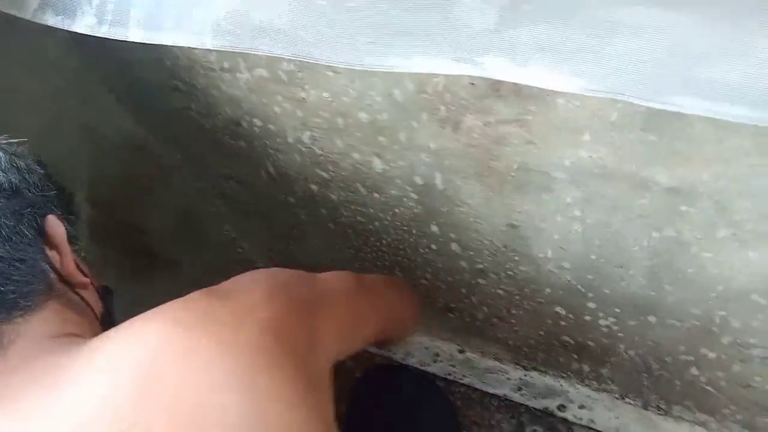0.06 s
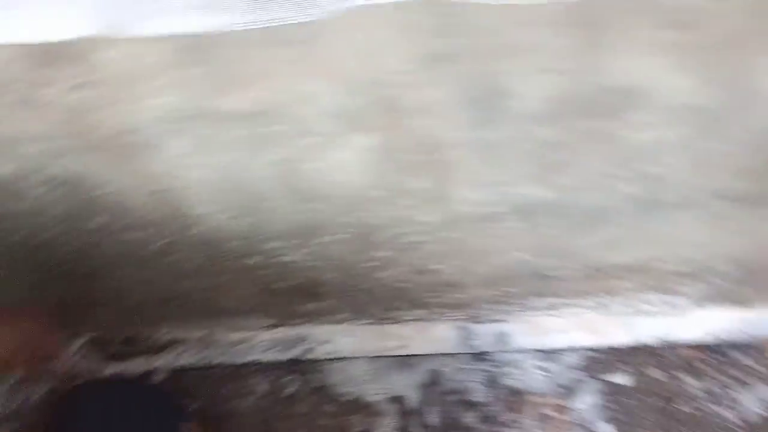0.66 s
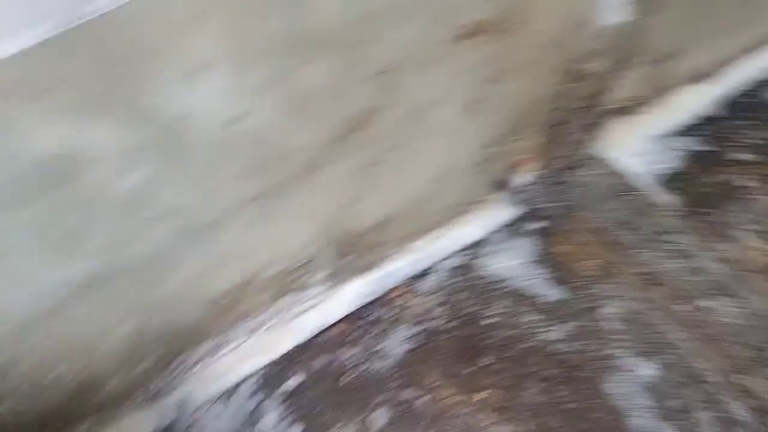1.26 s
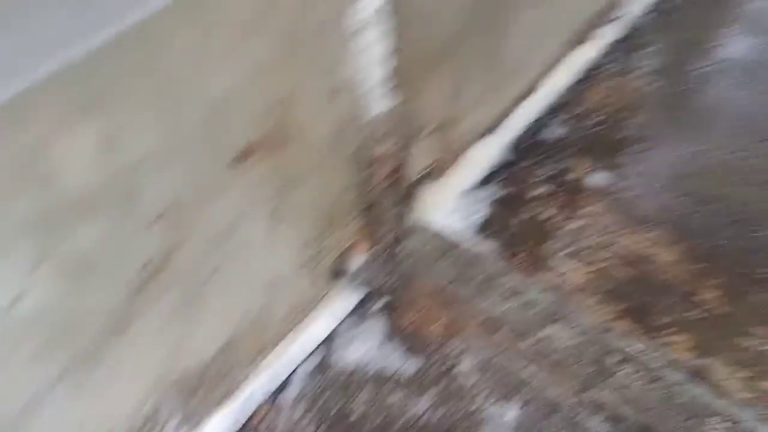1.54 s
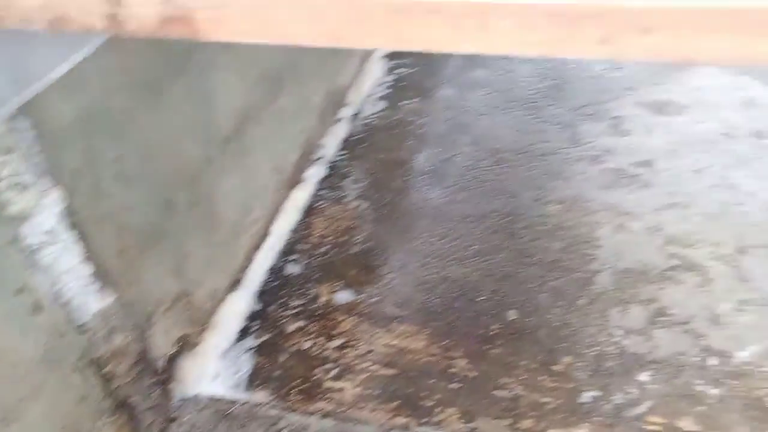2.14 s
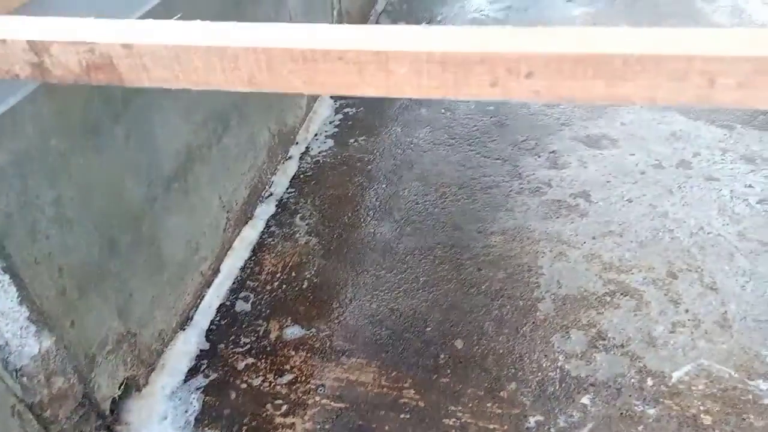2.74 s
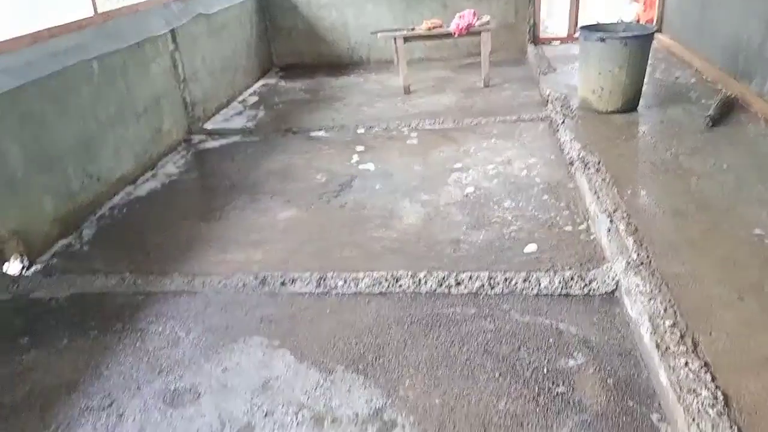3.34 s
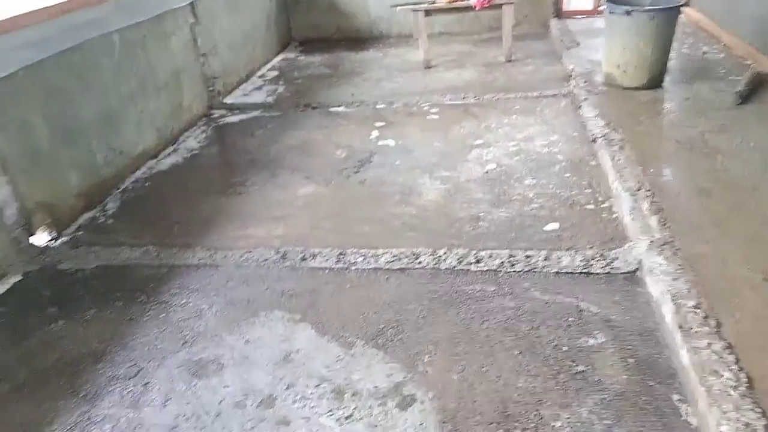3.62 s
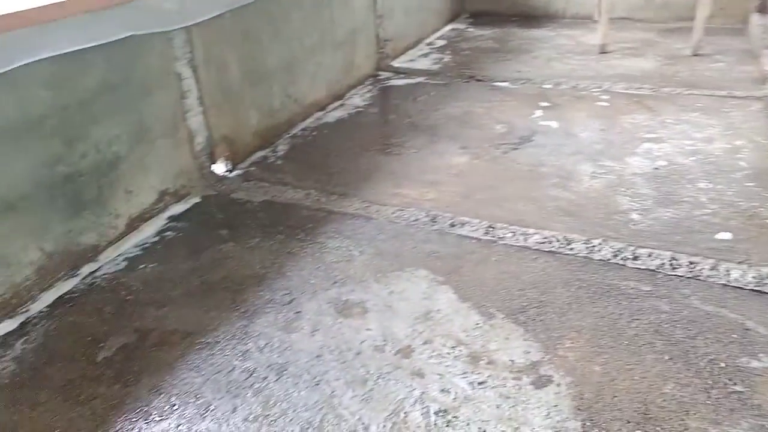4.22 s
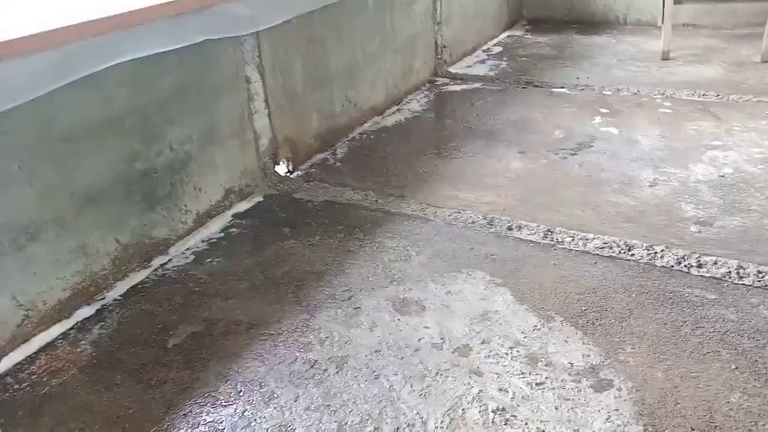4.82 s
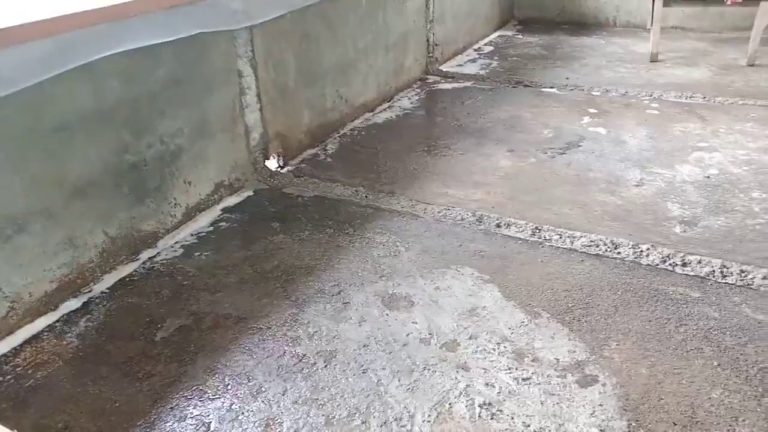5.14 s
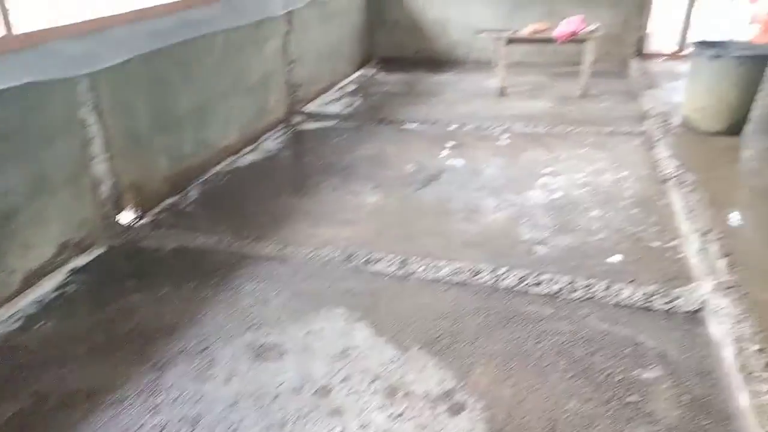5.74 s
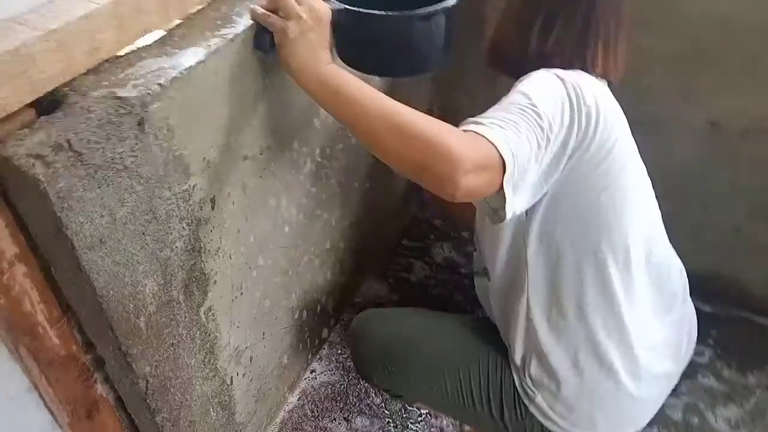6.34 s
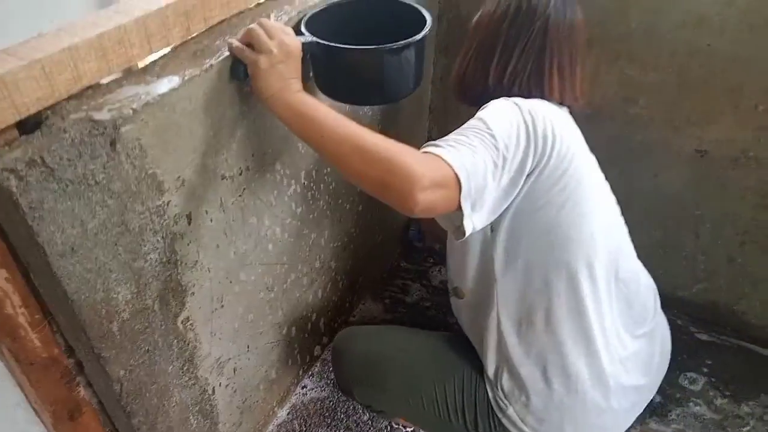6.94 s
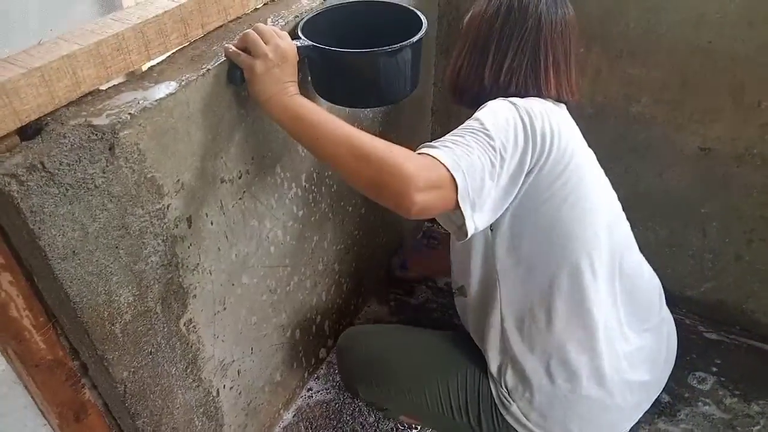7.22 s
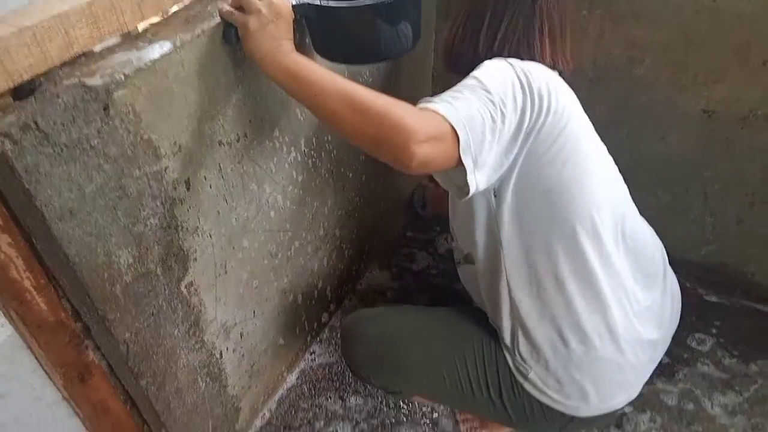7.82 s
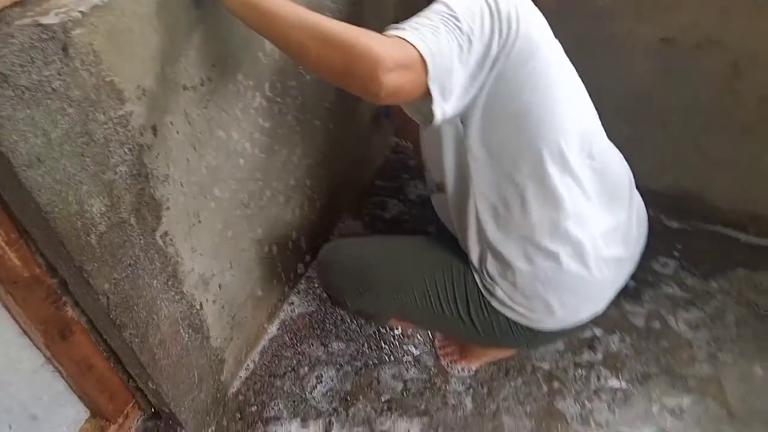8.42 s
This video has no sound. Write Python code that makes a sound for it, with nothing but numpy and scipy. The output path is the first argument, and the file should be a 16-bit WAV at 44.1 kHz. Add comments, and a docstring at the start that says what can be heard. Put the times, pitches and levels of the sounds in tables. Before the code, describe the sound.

Stiff bristles rasp and fizz back and forth over soapy concrete, hard then lightly, the brush knocking now and then.

```python
"""Hand brushes scrub three wet, soapy concrete walls of a farm building, four or five strokes a second. On the
first wall, bristles rasp over grit, suds fizz and the brush block rubs, hard and then lightly, over a far
motor, murmuring air and a hollow drone. Bristles snap free; fingers tap and bump a hand-held case. After a
brief silence near 3 s the motor is gone and the second wall is scrubbed, the block knocking now and then. At
6.28 s the scene changes: another hand scrubs the third wall in uneven, gritty strokes."""
import sys
import numpy as np
from scipy import signal
from scipy.fft import rfft, irfft, next_fast_len
from scipy.io import wavfile
from scipy.ndimage import uniform_filter1d

SR = 44100
rng = np.random.default_rng(int(sys.argv[2]) if len(sys.argv) > 2 else 0)


def pcm_store(signal):
    """Save signal as 16-bit PCM."""
    levels = np.round(np.clip(np.atleast_2d(signal), -1, 1) * 32767)
    wavfile.write(sys.argv[1], SR, levels.astype(np.int16).T)


N = 373522
TIME = np.arange(N) / SR


def from_db(db):
    """Amplitude grows tenfold for every 20 dB."""
    return 10 ** (np.asarray(db) / 20)


def unit_power(x):
    """Division by the RMS amplitude gives unit power."""
    return x / np.sqrt(np.mean(x ** 2) + 1e-20)


def in_time(rows):
    """Linear interpolation joins (time, value) points into a curve."""
    return np.interp(TIME, *np.transpose(rows))


def drift(per_s):
    """Interpolated random values form a slow fluctuation of unit power."""
    knots = rng.standard_normal(4096)
    return unit_power(np.interp(TIME * per_s, np.arange(len(knots)), knots))


def lowpass(x, order, cutoff_hz):
    """A low-pass filter falls 6 dB per octave per order above its cutoff."""
    return signal.sosfilt(signal.butter(order, cutoff_hz, fs=SR, output="sos"), x)


def coloured(x, spectrum):
    """Spectral shaping, falling 20 dB per octave beyond the given points; unit power."""
    size = next_fast_len(N)
    hz = np.maximum(np.arange(size // 2 + 1) * SR / size, 1)
    points_hz, db = np.transpose(spectrum)
    octaves_outside = np.abs(np.log2(hz / np.clip(hz, points_hz[0], points_hz[-1])))
    gain = from_db(np.interp(np.log(hz), np.log(points_hz), db) - 20 * octaves_outside)
    return unit_power(irfft(rfft(x, size) * gain, size)[:N])


def resonance(x, hz, width_hz):
    """A damped two-pole resonator passes one band, with unit gain at its peak."""
    radius = np.exp(-np.pi * width_hz / SR)
    feedback = [1, -2 * radius * np.cos(2 * np.pi * hz / SR), radius ** 2]
    return signal.lfilter(np.array([1, 0, -1]) * (1 - radius ** 2) / 2, feedback, x + 1e-18)


def grains(per_s, spread_db):
    """Shot noise: independent clicks of uneven size, at unit power."""
    sizes = from_db(spread_db * np.minimum(rng.exponential(1, N), 5)) * rng.choice([-1, 1], N)
    return unit_power(sizes * (rng.random(N) < per_s / SR))


def decay(t, t60):
    """Exponential damping loses 60 dB in t60 seconds."""
    return np.exp(-np.log(1000) * t / t60)


def burst(t60):
    """A brief contact makes exponentially decaying noise."""
    t = TIME[:SR // 4]
    return rng.standard_normal(len(t)) * decay(t, max(t60, .002))


def add(track, start_s, sound, peak_db):
    """Superposition: a sound, scaled to the given peak, adds to a track."""
    at = max(round(start_s * SR), 0)
    track[at:at + len(sound)] += (sound * from_db(peak_db) / np.abs(sound).max())[:N - at]


def hand(turn_db, press_db, press_per_s):
    """Friction noise follows a power law of hand speed; gives rasp, fizz and rub levels in dB."""
    # strokes, with relative levels at full speed: start_s, rise_s, fall_s, rasp_db, fizz_db, rub_db
    strokes = [(-0.025, 0.08, 0.17, -22.5, -37, -41), (0.195, 0.15, 0.096, -20.5, -37, -39),
               (0.41, 0.17, 0.18, -20.5, -38, -35), (0.728, 0.21, 0.18, -19, -37, -34),
               (0.95, 0.054, 0.15, -27.5, -44.5, -35), (1.099, 0.11, 0.14, -35.5, -44, -58),
               (1.26, 0.16, 0.16, -36.5, -49, -64), (1.514, 0.14, 0.17, -37.5, -47, -61),
               (1.76, 0.18, 0.18, -35, -44, -58), (2.05, 0.074, 0.15, -37, -47, -50),
               (2.14, 0.1, 0.11, -32.5, -44, -47), (2.305, 0.13, 0.15, -33.5, -42, -59.5),
               (2.478, 0.15, 0.11, -25.5, -27, -54.5), (2.689, 0.206, 0.138, -27.5, -32.5, -51),
               (3.065, 0.071, 0.09, -42, -64.5, -71), (3.173, 0.17, 0.11, -30.5, -48.5, -57),
               (3.4, 0.13, 0.15, -30, -51, -57), (3.6, 0.142, 0.25, -33, -62, -73),
               (3.85, 0.085, 0.16, -26.5, -53.5, -63), (4.059, 0.085, 0.27, -25.5, -49, -67),
               (4.324, 0.12, 0.19, -20.5, -46, -58), (4.565, 0.12, 0.16, -21, -54, -62),
               (4.816, 0.14, 0.087, -24.5, -58.5, -36.5), (5.025, 0.13, 0.12, -22.5, -61, -43.5),
               (5.271, 0.088, 0.054, -30.5, -60.5, -47), (5.63, 0.098, 0.096, -50.5, -97, -38),
               (5.899, 0.11, 0.16, -42.5, -68.5, -47), (6.156, 0.038, 0.097, -40, -76, -42),
               (6.254, 0.057, 0.2, -36.5, -58.5, -42.5), (6.475, 0.11, 0.1, -36.5, -65.5, -46),
               (6.668, 0.23, 0.13, -38, -63.5, -42.5), (6.98, 0.12, 0.06, -52.5, -84, -57),
               (7.154, 0.16, 0.19, -29.5, -67.5, -37.5), (7.457, 0.078, 0.26, -33, -67, -47),
               (7.7, 0.077, 0.15, -42.5, -76, -47), (7.916, 0.02, 0.066, -36.5, -66.5, -46),
               (7.975, 0.042, 0.13, -33.5, -63, -42.5), (8.15, 0.1, 0.086, -35.5, -67, -50),
               (8.31, 0.1, 0.26, -41.5, -72.5, -52)]
    exponents = (1.48, 1.54, 2.37)   # rasp, fizz, rub
    power = np.zeros((3, N))
    for start, rise, fall, *full_db in strokes:
        end = start + rise + fall
        during = slice(*np.searchsorted(TIME, [start, end]))
        speed = np.sin(np.interp(TIME[during], [start, start + rise, end], [0, np.pi / 2, np.pi]))
        for layer, db, exponent in zip(power, full_db, exponents):
            layer[during] += (from_db(db) * np.abs(speed) ** exponent) ** 2
    # the bristles keep brushing as they flip over at the turn
    turning = from_db(turn_db) ** 2 * np.abs(uniform_filter1d(power, size=SR // 5))
    uneven_pressure_db = press_db * drift(press_per_s)
    return 10 * np.log10(power + turning + 1e-12) + uneven_pressure_db


def lightness(levels, usual_db):
    """Lubrication: a light, wet stroke has a fizz-to-rasp ratio above the wall's usual one (dB)."""
    rasp_level, fizz_level, _ = levels
    return uniform_filter1d(np.clip(fizz_level - rasp_level - usual_db, -15, 15), size=SR // 50)


def bristles(colour, lightness_db, flicks_per_s, spread_db, tilt, pivot_hz, tuft_db):
    """Stick-slip friction: tufts flick over grit, rasping low when bent hard, higher when skimming."""
    flicks = coloured(grains(flicks_per_s, spread_db), colour)
    low = signal.sosfiltfilt(signal.butter(3, pivot_hz, fs=SR, output="sos"), flicks)
    high = flicks - low
    lift = from_db(tilt * lightness_db)
    power = np.mean(low ** 2) + np.mean(high ** 2) * lift ** 2
    low = low * from_db(tuft_db * drift(90))
    high = high * from_db(tuft_db * drift(130))
    return (low + lift * high) / np.sqrt(power)


def tuft_ring(pitch, rasp_level, lightness_db, hard_db, ring_db, width_hz, waver):
    """Bent bristles resonate in a narrow band, weaker in soft strokes and damped by slippery suds."""
    soft_loss_db = 0.4 * np.maximum(hard_db - rasp_level, 0)
    slip_loss_db = 1.6 * np.maximum(lightness_db, 0)
    sway = lowpass(rng.standard_normal((2, N)), 2, width_hz / 2)
    phase = 2 * np.pi * np.cumsum(in_time(pitch) * (1 + waver * drift(40))) / SR
    band = unit_power(sway[0] * np.cos(phase) + sway[1] * np.sin(phase))
    return from_db(ring_db - soft_loss_db - slip_loss_db) * band


def scrub(levels, rasp, fizz_colour, rub_colour, rasp_db, fizz_db, rub_db, judder_db):
    """The hand's judder on the rough wall amplitude-modulates rasp, bursting suds and rubbing block."""
    rasp_level, fizz_level, rub_level = levels
    fizz = coloured(grains(per_s=16000, spread_db=2.5), fizz_colour)
    rub = coloured(grains(per_s=2500, spread_db=3.5), rub_colour)
    sound = (from_db(rasp_level + rasp_db) * rasp
             + from_db(fizz_level + fizz_db) * fizz
             + from_db(rub_level + rub_db) * rub)
    return sound * from_db(judder_db * drift(55))


def near_echoes(x, echo_db, travel_s):
    """Comb filtering: reflections from floor, arm and body shift in delay as the brush travels."""
    lags_s = np.geomspace(.002, .013, num=4)
    echoes = sum((-1) ** k * np.interp(TIME - lag - travel_s * drift(5), TIME, x, left=0)
                 for k, lag in enumerate(lags_s))
    return (x + from_db(echo_db) * echoes) / np.sqrt(1 + len(lags_s) * from_db(2 * echo_db))


def building(x, wet_db, t60, wall_hz):
    """Reverberation: bare concrete returns a dense, dull tail after 5 ms."""
    t = TIME[:SR]
    tail = lowpass(rng.standard_normal(SR) * decay(t, t60) * (t > .005), 2, wall_hz)
    return x + from_db(wet_db) * signal.fftconvolve(x, tail / np.linalg.norm(tail))[:N]


def first_wall(levels):
    """Friction excites the bristles in hard strokes close by, then in lighter, soapier ones."""
    # spectra of bristles, suds and rubbing block: frequency_hz, density_db
    rasp_colour = [(700, -31.5), (1150, -5), (1400, -5.5), (1680, -2.5), (2150, 0), (2450, 0), (3000, -1),
                   (3900, -7), (4900, -17), (6500, -18.5), (9000, -40)]
    fizz_colour = [(2000, -30), (3300, 5), (5000, -1), (6300, -3), (8000, -1), (9700, -9.5), (11300, -8),
                   (12500, -9.5), (13800, -4.5), (15600, -11)]
    rub_colour = [(120, -28.5), (230, -8.5), (340, 0.5), (440, -3), (600, -1), (720, 4.5), (950, 0.5),
                  (1250, -20), (1900, -20)]
    # bristle resonance as the grip changes: time_s, pitch_hz
    ring_pitch = [(0.1, 1600), (0.6, 1646), (0.85, 2007), (1.02, 1709)]
    light_db = lightness(levels, usual_db=-13.5)
    rasp = bristles(rasp_colour, light_db, flicks_per_s=12000, spread_db=2.0,
                    tilt=0.82, pivot_hz=2260, tuft_db=1.0)
    ring = tuft_ring(ring_pitch, levels[0], light_db,
                     hard_db=-21.5, ring_db=-2.5, width_hz=260, waver=0.045)
    sound = scrub(levels, from_db(-1.7) * rasp + ring, fizz_colour, rub_colour,
                  rasp_db=-1.75, fizz_db=1.05, rub_db=1.8, judder_db=0.26)
    sound = near_echoes(sound, echo_db=-18.5, travel_s=0.00014)
    return building(sound, wet_db=-16.5, t60=.45, wall_hz=5070)


def motor(level_db, fundamental_hz, waver, flutter_db):
    """Only low harmonics of a far motor carry, wavering a little in pitch and level."""
    # motor envelope: time_s, relative_db
    envelope = [(0.0, -48.5), (0.4, -49.5), (0.55, -39.5), (0.94, -47.5), (1.1, -45), (1.47, -42.5),
                (1.84, -56), (2.9, -54.5)]
    # motor harmonics: multiple, relative_db
    harmonics = [(2, 7.5), (3, -18), (4, -14)]
    phase = 2 * np.pi * np.cumsum(fundamental_hz * (1 + waver * drift(5))) / SR
    hum = sum(from_db(db + flutter_db * drift(7.8)) * np.sin(k * phase) for k, db in harmonics)
    return from_db(in_time(envelope) + level_db) * hum


def air(level_db):
    """Broadband noise of outdoor air fills the building with a low murmur."""
    # spectrum of the air: frequency_hz, density_db
    colour = [(20, -46), (32, -19.5), (48, -10.5), (80, 2), (140, -3), (210, -3.5), (350, -10), (600, -13),
              (1200, -16.5), (3000, -14.5), (7000, -54), (11300, -49), (15000, -63.5)]
    # its envelope: time_s, relative_db
    envelope = [(0.0, -47), (2.85, -50), (3.1, -60), (3.28, -46), (4.5, -49.5), (5.0, -45), (6.2, -44.5),
                (6.6, -51), (8.46, -53.5)]
    return from_db(in_time(envelope) + level_db) * coloured(rng.standard_normal(N), colour)


def drone(level_db):
    """Narrow resonances filter far-off noise into faint, hollow, wavering tones."""
    # drone resonances: centre_hz, width_hz, relative_db
    bands = [(130.6, 7.9, 4), (161.7, 10, -7.5), (262, 11, -4.5), (301.8, 9.3, -1.5), (343, 29, 3),
             (382, 26, 0.5), (453, 57, -1), (541, 31, -11), (597, 45, -5), (815, 27, -10)]
    # drone envelope: time_s, relative_db
    envelope = [(0, -63.5), (2.1, -42), (2.9, -46), (3.2, -65.5), (4.5, -58), (5.2, -40.5), (6.4, -58),
                (8.4, -55.5)]
    far = rng.standard_normal(N)
    tones = sum(from_db(db) * unit_power(resonance(resonance(far, hz, width), hz, width))
                for hz, width, db in bands)
    return from_db(in_time(envelope) + level_db) * unit_power(tones)


def snaps(level_db, width_hz, plink_db):
    """A stiff bristle springs free with a tick, and a small bubble rings as a damped oscillator."""
    # bristle releases: start_s, relative_peak_db, pitch_hz, t60_s
    releases = [(2.0812, -21, 2190, 0.04), (2.379, -18, 3220, 0.039), (2.423, -19, 3230, 0.019),
                (2.4528, -16, 2620, 0.02), (5.4889, -29.5, 2330, 0.1), (5.824, -33.5, 3000, 0.02),
                (6.179, -27.5, 2710, 0.035), (6.517, -30, 2410, .04)]
    out, t = np.zeros(N), TIME[:SR // 4]
    for start_s, peak_db, hz, t60 in releases:
        tick = resonance(resonance(burst(t60), hz, width_hz), hz, width_hz)
        plink = np.sin(2 * np.pi * hz * t) * decay(t, t60)
        add(out, start_s, unit_power(tick) + from_db(plink_db) * unit_power(plink), peak_db + level_db)
    return out


def taps(level_db, damping):
    """The impulse response of a stiff, heavily damped case to a fingertip is a dry click."""
    # finger taps: start_s, relative_peak_db, centre_hz
    touches = [(2.9094, -9, 1646), (3.9997, -23.5, 415), (6.1270, -26.5, 1050), (6.1283, -32, 382),
               (6.1367, -29, 422), (6.2102, -29, 900)]
    out = np.zeros(N)
    for start_s, peak_db, hz in touches:
        click = resonance(signal.unit_impulse(SR // 20), hz, damping * hz)
        add(out, start_s, lowpass(click, 4, 1.4 * hz), peak_db + level_db)
    return out


def bumps(level_db):
    """A soft push starts a damped oscillation that swells and dies; hollow things ring longer."""
    # soft bumps: start_s, relative_peak_db, pitch_hz, decay_cycles
    pushes = [(2.913, -29, 131, 2.1), (4.001, -32.5, 130, 4.3), (5.259, -32.5, 97, 5.7),
              (5.845, -35, 413, 24), (6.003, -24.5, 193, 2.4), (6.08, -36, 573, 26), (6.211, -23, 100, 2.7),
              (7.418, -31, 318, 23), (7.621, -36, 91, 3.3), (8.123, -36, 195, 2.2)]
    out, t = np.zeros(N), TIME[:SR // 4]
    for start_s, peak_db, hz, cycles in pushes:
        swell = t * decay(t, cycles / hz)
        add(out, start_s, swell * np.sin(2 * np.pi * hz * t), peak_db + level_db)
    return out


def second_wall(levels):
    """Friction in long strokes gives a narrow, dull rasp with a higher bristle resonance."""
    # spectra of bristles, suds and rubbing block: frequency_hz, density_db
    rasp_colour = [(700, -30), (1200, -16), (1600, -9), (1950, -2), (2130, -5), (2370, -1), (2950, -1),
                   (3800, -5), (4400, -13.5), (5200, -19), (6300, -37.5), (8000, -75)]
    fizz_colour = [(3500, -24), (5500, 5), (7000, -3), (9500, -6.5), (11500, 0), (12800, -6.5),
                   (14300, -13), (15600, -22)]
    rub_colour = [(140, -17), (260, 3), (380, 2), (560, 4.5), (800, 6), (1100, 0), (1400, -0.5),
                  (2100, -17)]
    # bristle resonance as the grip changes: time_s, pitch_hz
    ring_pitch = [(3.75, 2865), (4.15, 2727), (4.5, 3100), (4.72, 2623), (5.2, 2834)]
    light_db = lightness(levels, usual_db=-28)
    rasp = bristles(rasp_colour, light_db, flicks_per_s=9000, spread_db=0.5,
                    tilt=0.54, pivot_hz=3670, tuft_db=1.3)
    ring = tuft_ring(ring_pitch, levels[0], light_db,
                     hard_db=-27.5, ring_db=-5.5, width_hz=520, waver=.04)
    sound = scrub(levels, from_db(-1.5) * rasp + ring, fizz_colour, rub_colour,
                  rasp_db=-1.38, fizz_db=-0.7, rub_db=-1.5, judder_db=1.0)
    sound = near_echoes(sound, echo_db=-15.5, travel_s=0.00019)
    return building(sound, wet_db=-19.0, t60=0.42, wall_hz=4080)


def knocks(level_db, focus_db, crunch_db):
    """Modal excitation: each blow crunches and rings the block; its hardness selects the modes."""
    # blows of the brush on the wall: start_s, relative_peak_db, centre_hz, contact_t60_s
    blows = [(3.15,-31,640,0.14), (4.858,-7,899,0.034), (5.096,-22,450,0.1), (5.825,-29.5,600,0.049),
             (6.289,-23.5,950,0.084), (6.558,-19.5,610,0.15), (6.731,-25,520,0.14), (6.808,-24,450,0.24),
             (6.843,-22.5,496,0.059), (7.413,-26,520,0.052), (7.716,-17,680,0.068), (7.924,-30,1520,0.057),
             (8.002,-28,635,0.09), (8.252,-13,1400,0.038), (8.264,-9.5,1920,0.023)]
    # modes of the block and its grip: frequency_hz, gain_db, t60_s
    modes = [(323, 0.5, 0.038), (456, 5.5, 0.059), (546, 2.5, 0.15), (778, 4, 0.013), (954, -2, 0.018),
             (1280, 3, 0.011), (1683, -0.5, 0.015), (1910, 1.5, 0.0043), (2440, -14, 0.016),
             (3230, -12, 0.01)]
    out = np.zeros(N)
    for start_s, peak_db, centre_hz, contact_t60 in blows:
        contact = burst(contact_t60)
        ring = np.zeros_like(contact)
        for k, (hz, db, t60) in enumerate(modes):
            gain = (-1) ** k * from_db(db - focus_db * np.log2(hz / centre_hz) ** 2)
            ring += gain * resonance(contact, hz, width_hz=np.log(1000) / np.pi / t60)
        crunch = resonance(contact, centre_hz, width_hz=0.89 * centre_hz)
        knock = unit_power(ring) + from_db(crunch_db) * unit_power(crunch)
        add(out, start_s, knock, peak_db + level_db)
    return lowpass(out, 4, 3200)


def third_wall(levels):
    """Sliding friction makes the block rumble on the concrete in uneven, gritty strokes."""
    # spectra of bristles, suds and rubbing block: frequency_hz, density_db
    rasp_colour = [(700, -9.5), (1200, -8.5), (1600, -6), (1950, -4), (2230, 1), (2800, -3.5), (3600, -8),
                   (4400, -22.5), (5200, -28), (6300, -43), (8000, -47)]
    fizz_colour = [(3500, -20), (5500, -2), (7000, -12.5), (8500, -9), (10000, -4.5), (11300, 2),
                   (12800, -8), (15600, -21)]
    rub_colour = [(160, -11), (240, -0.5), (320, -0.5), (445, -0.5), (600, -1.5), (760, -0.5), (1000, -4.5),
                  (1300, -3), (1900, -2)]
    light_db = lightness(levels, usual_db=-33)
    rasp = bristles(rasp_colour, light_db, flicks_per_s=6800, spread_db=2.5,
                    tilt=1.0, pivot_hz=2430, tuft_db=-1.8)
    sound = scrub(levels, rasp, fizz_colour, rub_colour,
                  rasp_db=-1.7, fizz_db=-1.0, rub_db=-0.1, judder_db=1.25)
    sound = near_echoes(sound, echo_db=-15, travel_s=.00015)
    return building(sound, wet_db=-17.5, t60=0.32, wall_hz=4130)


def scene():
    """The sources superpose: the first wall, a moment of silence, then the second wall and, after an abrupt
    change of scene, the third."""
    silence_start_s, silence_end_s, third_start_s = 2.959, 3.085, 6.28
    levels = hand(turn_db=-13.5, press_db=1, press_per_s=22)
    impacts = knocks(level_db=-1.0, focus_db=8.5, crunch_db=-3)
    impacts += snaps(level_db=-4, width_hz=670, plink_db=-4)
    shared = building(impacts, wet_db=-13.5, t60=0.36, wall_hz=3530)
    shared += bumps(level_db=0.5) + taps(level_db=5, damping=3.2)
    shared += air(level_db=-1.5) + drone(level_db=-4.5)
    first = first_wall(levels) + motor(level_db=-1.0, fundamental_hz=44.4, waver=0.0077, flutter_db=1.0)
    later = np.where(TIME < third_start_s, second_wall(levels), third_wall(levels))
    return ((first + shared) * (TIME < silence_start_s) + (later + shared) * (TIME > silence_end_s))[None]


def record(dry):
    """An elliptic low-pass filter cuts the top of the spectrum steeply."""
    cutoff_hz = 15600
    return signal.sosfilt(signal.ellip(10, .1, 80, cutoff_hz, fs=SR, output="sos"), dry)


dry = scene()
out = record(dry)
pcm_store(out)
```